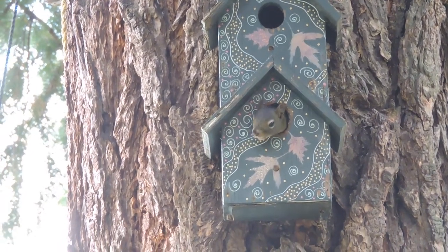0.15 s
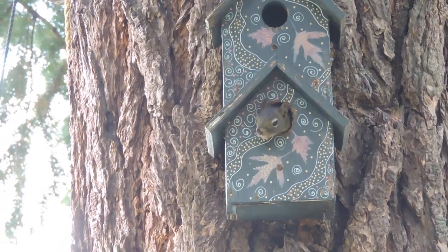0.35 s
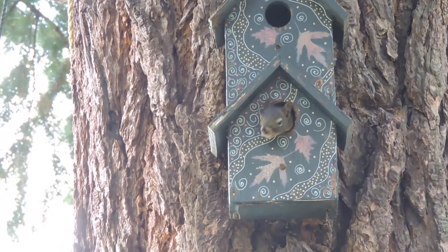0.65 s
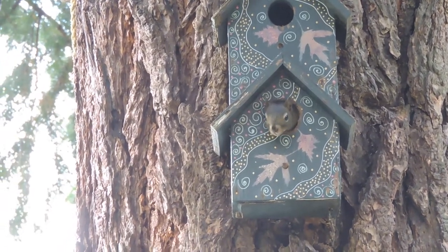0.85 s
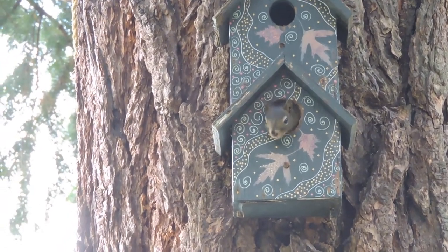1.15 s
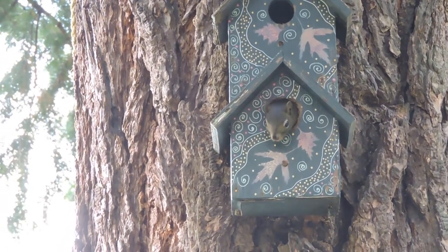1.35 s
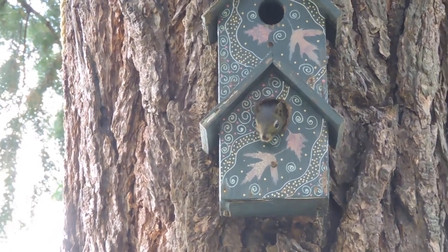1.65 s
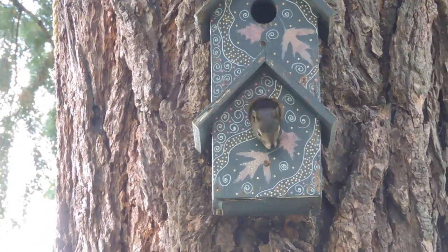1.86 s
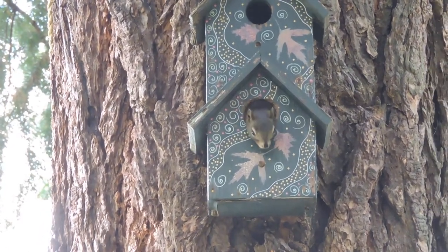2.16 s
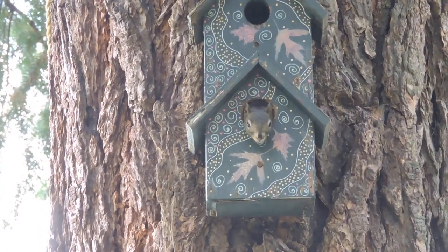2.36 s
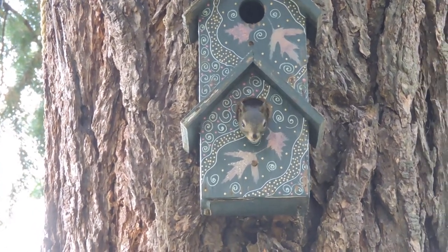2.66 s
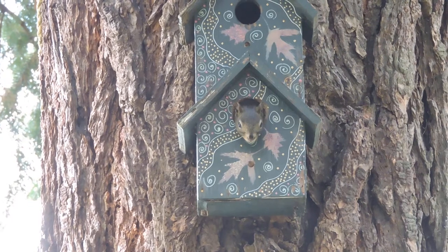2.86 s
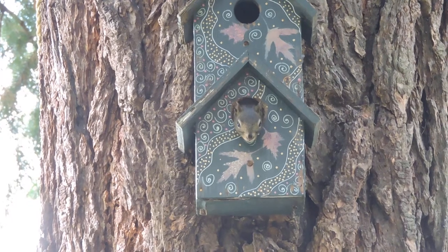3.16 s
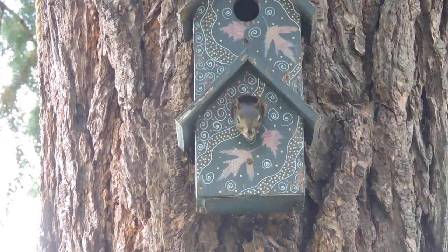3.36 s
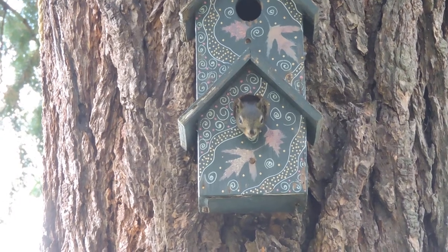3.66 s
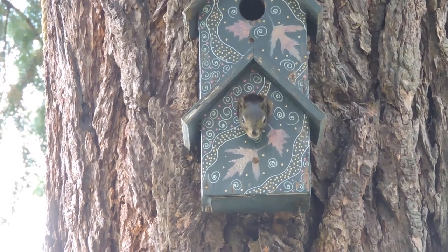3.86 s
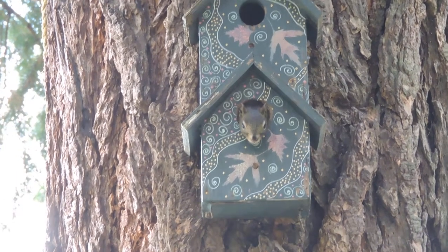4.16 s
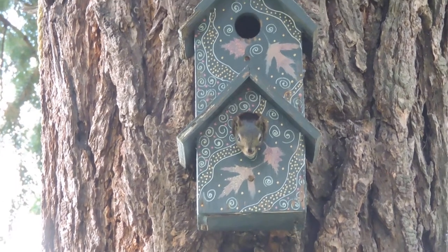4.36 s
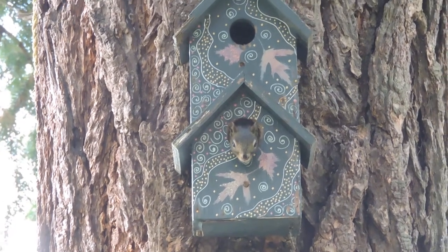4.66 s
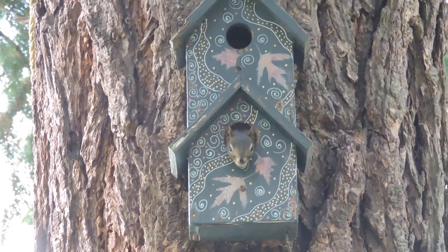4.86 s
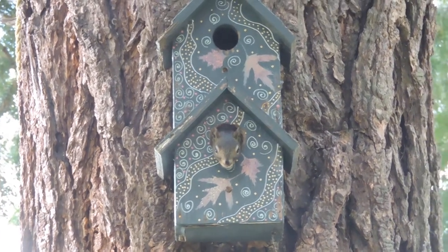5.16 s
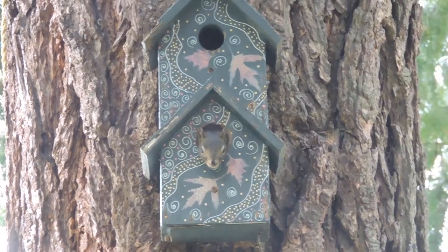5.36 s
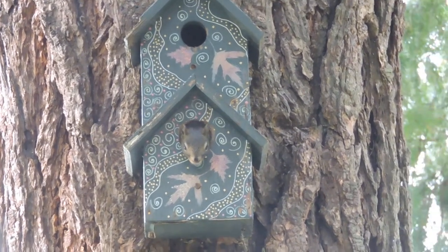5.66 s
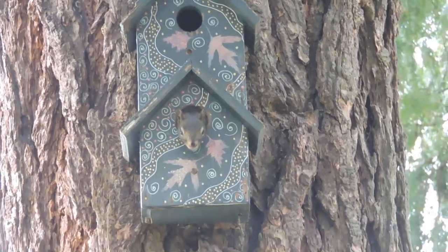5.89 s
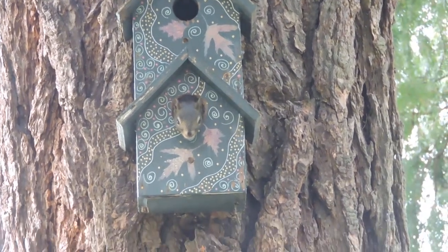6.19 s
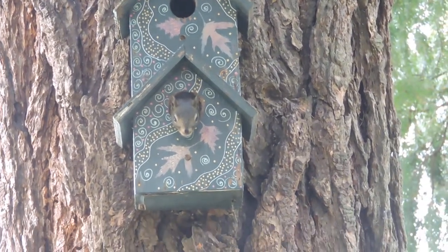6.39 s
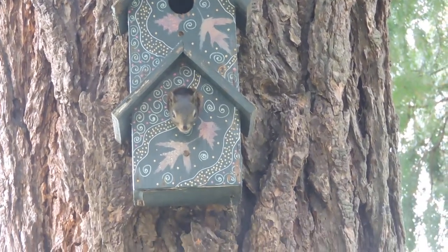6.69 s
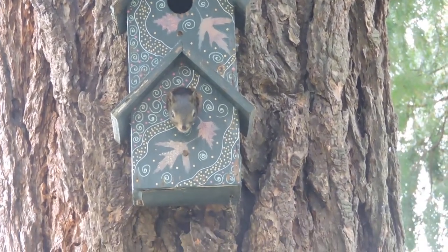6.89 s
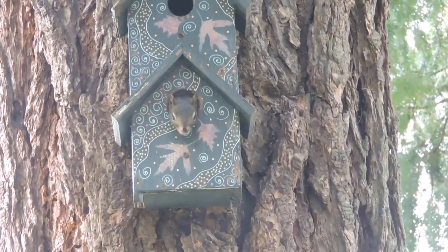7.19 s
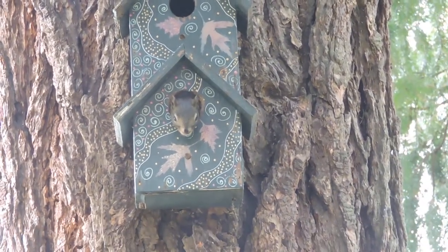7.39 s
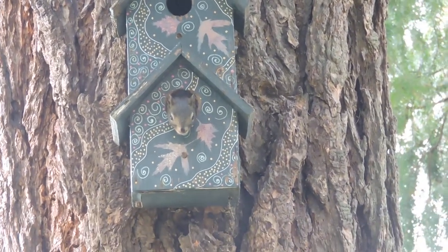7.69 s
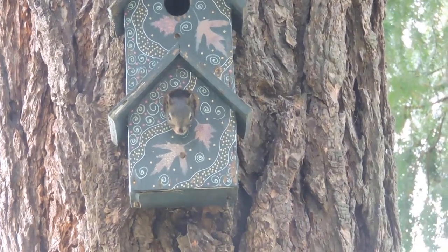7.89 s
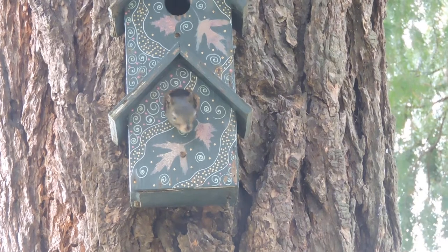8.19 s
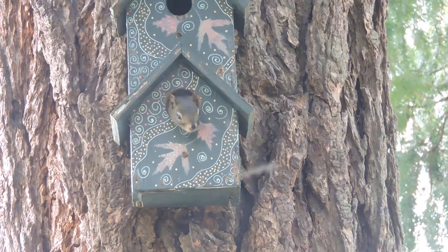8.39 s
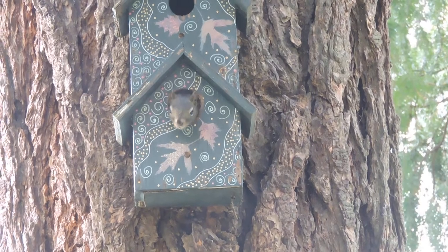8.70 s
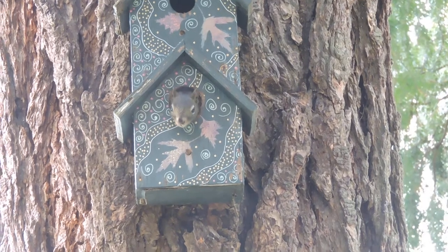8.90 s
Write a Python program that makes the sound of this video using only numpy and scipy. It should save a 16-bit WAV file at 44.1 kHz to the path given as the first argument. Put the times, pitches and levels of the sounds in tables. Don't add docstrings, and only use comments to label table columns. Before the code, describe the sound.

Piercing squirrel alarm calls, tiny squeaks snapping into harsh barks, repeat irregularly outdoors with short woodland echoes above a soft low rumble.

```python
import sys
import numpy as np
from scipy import signal
from scipy.fft import rfft, irfft, next_fast_len
from scipy.io import wavfile
from scipy.ndimage import uniform_filter1d

SR = 44100
rng = np.random.default_rng(int(sys.argv[2]) if len(sys.argv) > 2 else 0)


def persist_wave(psi):
    counts = np.round(np.clip(psi, -1, 1) * 32767).astype(np.int16)
    wavfile.write(sys.argv[1], SR, np.atleast_2d(counts).T)


def invert_db(level):
    return 10 ** (np.asarray(level, dtype=float) / 20)


N = 398663


def scold(animal):
    # onset in seconds, length in seconds, top pulse rate in Hz, mouth and throat level in dB.
    calls = [ (1.146, 0.0431, 1170, -23, -37), (1.207, .046, 982, -26, -42),
             (1.657, 0.0381, 1092, -25, -39.5), (2.56, 0.0402, 1160, -20, -34.5),
             (2.893, 0.02845, 997.5, -33, -34), (3.123, 0.0484, 1149.5, -22.5, -34.5),
             (3.309, 0.0438, 1034.5, -24, -36), (3.519, 0.0466, 1060, -25.5, -37.5),
             (3.749, 0.0487, 1130, -24.5, -36), (3.974, 0.0468, 1089, -24.5, -36.5),
             (4.167, 0.0388, 969, -27, -37.5), (4.984, 0.0484, 1252.5, -23.5, -34),
             (5.353, 0.0342, 991, -34, -35), (5.742, 0.0621, 1138, -27.5, -39),
             (6.327, .048, 1109, -29, -38.5), (6.668, .066, 1059, -35, -40.5),
             (7.052, 0.0495, 998, -30.5, -43.5), (7.381, 0.0497, 1049.5, -30, -44),
             (7.969, 0.0442, 1069, -24, -42), (8.328, 0.039, 964.5, -35.5, -44),
             (8.598, 0.02275, 885, -57, -43)]
    nose_levels = [-40, -42, -43, -44, -38, -41, -43.5, -41.5, -41, -42, -39.5, -36.5, -39.5, -42, -46,
                   -49.5, -54.5, -53, -46, -53, -61]
    roughness = [.2, .3, .3, .25, .25, .45, .5, .5, .5, .5, .5, .15, .35, .55, .55, .6, .5, .35, .25, .45,
                 .6]
    # time the lips take to part in seconds, slow after a whistle, quick in the run.
    parting_times = [.016, .03, .018, 0.0135, .012, .012, .01, 0.016, 0.0121, 0.0157, .012, 0.0211, 0.024,
                     0.0174, 0.013, 0.032, 0.019, .018, 0.0286, .016, .014]
    for call, nose_db, rough, parting_s in zip(calls, nose_levels, roughness, parting_times):
        add(animal, *chuck(chuck_rows(*call, nose_db), rough, parting_s))


def chuck_rows(s, length, hz, mouth_db, throat_db, nose_db):
    # share of the top pulse rate, then mouth, throat and nose level in dB.
    chuck_shape = [
        (.63, -46.5, -27, -15.5),
        (.70, -8, -6.5, -10.5),
        (.93, -0.5, -1, 1),
        (1.01, -14, -10.5, -7),
        (1.02, -20, -31.5, -2),
    ]
    lead_s, peak_at, hold_at = 0.008, 0.27, 0.6
    shares = [-lead_s / length, 0, peak_at, hold_at, 1]
    usual_s, sustain_db_per_s = 0.0537, 604
    lift_db = sustain_db_per_s * (length - usual_s)
    rows = []
    for share, (rate, mouth, throat, nose) in zip(shares, chuck_shape):
        mouth_now_db = mouth_db + mouth + lift_db * max(share - peak_at, 0)
        rows.append((s + share * length, hz * rate, mouth_now_db, throat_db + throat, nose_db + nose))
    return rows


def chuck(rows, rough, parting_s):
    # centre in Hz, width in Hz, level in dB.
    throat_modes = [(1900, 800, -25), (3200, 800, 0), (4700, 1100, -13)]
    nose_modes = [(5600, 1190, -3), (6600, 1096, 5), (7422, 2090, 1.5)]
    mouth_modes = [(12340, 1720, 3.5), (15030, 2700, -22), (9656, 1470, -12)]
    start, t, (hz, mouth_db, throat_db, nose_db) = columns(rows)
    jitter, breath, slam = rng.standard_normal((len(t), 3)).T
    peak_s, end_s = rows[2][0], rows[-1][0]
    late = np.clip((t + start - peak_s) / (end_s - peak_s), 0, 1)
    arch = 1 + 0.081 * np.sin(np.pi * late ** 0.7)
    hz = uniform_filter1d(hz, 200) * arch * (1 - 0.2 * np.exp(-t / 0.005))
    rough = np.clip(rough + 0.374 * late, 0, 0.95)

    turns = np.cumsum(hz * (1 + 0.33 * rough * uniform_filter1d(jitter, 40))) / SR
    pulses = evened(sum(np.cos(2 * np.pi * k * turns) * (k * hz < 17000) for k in range(1, 30)))
    puffs = evened((0.16 + np.exp(-(turns % 1) / 0.408)) * breath)
    uneven = invert_db(2.89 * rough * evened(uniform_filter1d(slam, 70)))
    harsh = uneven * (np.sqrt(1 - rough) * pulses + np.sqrt(rough) * puffs)
    throat_drive = uneven * (pulses + 2.57 * rough * puffs)

    shut = np.exp(-(t / parting_s) ** 2)
    opening = [(11400 - 2300 * shut, 1400, -3)]
    opening += [(f, width, db - 9 * shut) for f, width, db in mouth_modes]
    larynx = (hz.max() / 1200) ** 0.451
    lifted = [(f * larynx, width, db) for f, width, db in throat_modes]
    voice = invert_db(mouth_db) * tract(harsh, opening) + invert_db(nose_db - 1) * tract(harsh, nose_modes)
    voice += invert_db(throat_db) * tract(throat_drive, lifted)
    thump = np.sin(2 * np.pi * turns) + 0.425 * tract(puffs, [(825, 1836, 0)])
    chest = invert_db(0.3138 * mouth_db - 41.0) * uneven * thump
    return start, (invert_db(0.5) * voice + chest) * signal.windows.tukey(len(t), 0.2)


def steady_whistles(animal):
    # start in seconds, length in seconds, pitch in Hz, tone level and octave level in dB.
    level = [
        (1.107, 0.0268, 6204, -29.5, -49),
        (1.609, .032, 6231, -31, -50),
        (6.278, 0.0184, 6394, -40, -61),
        (6.976, 0.021, 5920, -62.5, -83.5),
    ]
    held = [
        (1.185, 0.01964, 5990, -33.5, -52.5),
        (4.947, 0.0282, 6223, -23.5, -40),
        (7.652, 0.0499, 6237, -45, -52),
    ]
    peeps = [
        (2.924, .021, 5726, -33.5, -38.5),
        (8.252, .038, 5495, -65.5, -77),
        (8.621, 0.0298, 5398, -41.5, -52.5),
    ]
    # share of the length, share of the pitch, then tone, octave and air level in dB.
    level_shape = [(0, .83, -38, -40, -45), (.15, .92, -22, -10, -35), (.42, 1.045, -14, -5, -29),
                   (.64, 1., -2, -2, -29), (.85, .995, 0, 0, -30), (1, .88, -24, -10, -32)]
    hold_shape = [(0, .87, -24, -20, -36), (.16, .94, -13, -6, -30), (.4, .995, -3, -1, -28),
                  (.62, 1.005, 0, 0, -28), (.86, 1., -1, -4, -27), (1, .96, -16, -20, -26)]
    peep_shape = [(0, 0.78, -9, -16, -24.5), (.2, 0.982, -5.5, 3.5, -27.5), (.42, 1., 0, -1.5, -24),
                  (.72, .96, 0.5, 0, -28.5), (1, .87, -9.5, -12.5, -25.5)]
    for shape, calls in [(level_shape, level), (hold_shape, held), (peep_shape, peeps)]:
        for s, length, hz, tone_db, octave_db in calls:
            rows = [(s + share * length, hz * pitch, tone_db + tone, octave_db + octave, tone_db + hiss)
                    for share, pitch, tone, octave, hiss in shape]
            add(animal, *whistle(rows))


def leaping_whistles(animal):
    # start in seconds, length in seconds, crack pitch in Hz, landing level and air level in dB.
    leaps = [(2.514, 0.0374, 7800, -27.5, -44), (5.698, 0.0365, 7680, -32.5, -46),
             (6.285, 0.0305, 7240, -55.5, -42.5), (6.624, 0.0364, 7250, -35.5, -51.5),
             (6.990, .051, 7050, -32.5, -58.5), (7.334, 0.0361, 7450, -39, -53.5),
             (7.919, 0.041, 7920, -33, -50.5)]
    # share of the length, share of the landing pitch, share of the crack,
    # then tone, octave and air level in dB.
    leap_shape = [(0, .85, 0.073, -35, -41.5, -34.5), (.18, .97, 0, -19, -6.5, -14.5),
                  (.42, 1.02, .45, -33, -24.5, -1.5), (.66, 1., 1., -19, -39.5, 4),
                  (.77, 1., 0.724, -10.5, -29.5, -1), (.87, 1., 0.032, 2, 6, 2),
                  (1, 0.897, 0, -27.5, -26, -2)]
    land_hz, land_octave_db = 6237, -18
    for s, length, crack_hz, tone_db, air_db in leaps:
        rows = [(s + share * length, land_hz * pitch + jump * (crack_hz - land_hz), tone_db + tone,
                 tone_db + land_octave_db + octave, air_db + hiss)
                for share, pitch, jump, tone, octave, hiss in leap_shape]
        add(animal, *whistle(rows))


def whistle(rows):
    start, t, (hz, tone_db, octave_db, air_db) = columns(rows)
    waver, breath = rng.standard_normal((len(t), 2)).T
    wavering_hz = uniform_filter1d(hz, 60) * (1 + 0.00875 * evened(uniform_filter1d(waver, 60)))
    phase = 2 * np.pi * np.cumsum(wavering_hz) / SR
    tone = np.sqrt(2) * (invert_db(tone_db) * np.sin(phase) + invert_db(octave_db) * np.sin(2 * phase))
    hiss = tract(breath, [(12400, 1530, 1.67), (10200, 1530, -1.6), (6900, 2700, 1.1)])
    return start, (tone + invert_db(air_db) * hiss) * signal.windows.tukey(len(t), 0.06)


def wheezes(animal):
    # start in seconds, length in seconds, level in dB, centre in Hz, width in Hz.
    breaths = [(0.012, 0.036, -63.5, 6900, 1200), (0.076, 0.043, -63.5, 6680, 900),
               (0.246, 0.085, -68.5, 8100, 700), (4.575, 0.16, -68, 6900, 1500),
               (4.598, 0.13, -67.5, 12500, 2500), (4.76, 0.069, -67, 7140, 250),
               (4.78, 0.111, -70, 12400, 1200), (4.815, 0.133, -64, 6470, 900),
               (5.905, .035, -66.5, 7130, 200), (5.961, 0.094, -66, 6450, 900),
               (6.099, 0.119, -63.5, 6681, 1800), (6.091, 0.142, -67.5, 12200, 2200),
               (7.615, 0.0505, -57, 6180, 3000), (9.023, 0.023, -62, 6600, 1200),
               (1.792, 0.0128, -52.5, 2290, 90), (1.881, 0.014, -54, 2346, 91.3),
               (2.199, 0.045, -65, 3936, 200), (6.294, 0.01873, -38.5, 10000, 900),
               (8.598, 0.014, -55.5, 5600, 200), (1.119, 0.0102, -51, 9240, 196.9)]
    for s, length, db, hz, width in breaths:
        noise = rng.standard_normal(round(length * SR))
        fade = signal.windows.tukey(len(noise), 0.6)
        add(animal, s, invert_db(db) * evened(resonate(noise, hz, width)) * fade)


def claw_ticks(animal):
    # start in seconds, peak level in dB, ring in Hz.
    ticks = [(0.4715, -50, 11200), (4.4902, -53.5, 12000), (4.5138, -48, 11100), (4.522, -50.5, 11200),
             (4.7596, -48, 10700), (5.9581, -51.5, 9500), (7.3536, -32, 6670)]
    t = np.arange(300) / SR
    for s, db, hz in ticks:
        ring = evened(resonate(rng.standard_normal(len(t)), hz, 4030))
        add(animal, s, invert_db(db - 60 * t / 0.0116) * ring)


def grove(x):
    # band in Hz, time to fall 60 dB in seconds.
    decay = [(1000, 0.474), (3000, 0.2765), (6000, 0.312), (12000, 0.282)]
    # delay in seconds, level in dB.
    echoes = [
        (.0009, -31),
        (.0023, -47.5),
        (.0046, -14),
        (0.0193, -2.5),
        (0.031, -9),
    ]
    # band in Hz, left-right level in dB, left lag in radians, reflected level in dB.
    port_bands = [(400, -3, .1, -8), (1000, 1.5, .3, -9), (2400, -4.5, .8, -5), (4400, -3, .4, -5),
                  (6500, -5.5, .9, -6), (9300, -10.5, 1.6, -6), (11000, -10, 1, -9),
                  (12500, -6.5, 1.2, -10), (15500, -3, 1.6, -7)]
    taps = np.zeros((2, SR // 2))
    at = np.arange(300, SR // 2 - 20, 20) + rng.integers(0, 20, (2, (SR // 2 - 301) // 20))
    np.put_along_axis(taps, at, rng.choice([-1., 1.], at.shape), 1)
    taps[0] = 0.144 * taps[1] + 2.13 * taps[0]
    hz, t, z = signal.stft(taps, SR, nperseg=256)
    tail = signal.istft(z * invert_db(-60 * t / read(decay, hz)[:, None]), SR, nperseg=256)[1]
    tail /= np.linalg.norm(tail, axis=1, keepdims=True)
    for s, db in echoes:
        tail[[0, 1], round(s * SR) + rng.integers(-5, 6, 2)] += invert_db(db)

    size = next_fast_len(N + SR)
    hz = np.fft.rfftfreq(size, 1 / SR)
    lean_db, lag, wet_db = (read(np.take(port_bands, [0, k], 1), hz) for k in (1, 2, 3))
    ports = np.array([invert_db(lean_db / 2) * np.exp(-1j * lag), invert_db(-lean_db / 2)])
    room = 1 + invert_db(wet_db) * rfft(tail, size)
    return irfft(rfft(x, size) * ports * room, size)[:, :N]


def leaves_and_wash():
    # band in Hz, level in dB per Hz.
    spectrum = [(12, -29), (20, -3), (101, -7), (163, -10.5), (328, -15.5), (590, -21), (873, -19.5),
                (1060, -24.5), (1570, -25.5), (3250, -28.5), (3950, -30), (16000, -41)]
    # band in Hz, likeness of left and right from 0 to 1.
    likeness = [(60, 0.886), (380, 0.537), (2380, 0.229), (15000, 0.29)]
    # band in Hz, left-right level in dB.
    lean_bands = [(60, -4.5), (240, -3), (950, 2.5), (3770, -1), (15000, 0.5)]
    frames, hz = N // 512 + 5, np.fft.rfftfreq(2048, 1 / SR)
    a, b, c, d, patches = rng.standard_normal((frames, 1025, 5)).T
    patches = evened(uniform_filter1d(uniform_filter1d(patches, 20, 0), 10, 1))
    same = np.clip(read(likeness, hz), 0, 1)[:, None]
    left = a + 1j * b
    right = same * left + np.sqrt(1 - same ** 2) * (c + 1j * d)
    lean = read(lean_bands, hz)[:, None] / 2
    z = np.array([invert_db(lean) * left, invert_db(-lean) * right])
    z *= invert_db(read(spectrum, hz)[:, None] + 1.407 * patches)
    return invert_db(-50) * evened(signal.istft(z, nperseg=2048, noverlap=1536)[1][:, :N])


def far_motors():
    # centre in Hz, width in Hz, level in dB.
    rumble = [(29.44, 7.34, 4.5), (56.9, 10.36, 0.5), (89.43, 20.3, -5.5)]
    drone = [(250, 66, -6), (337.7, 118.5, 3.5)]
    # centre in Hz, width in Hz, level in dB.
    fan = (885, 44, -73)
    # time in seconds, rumble level and drone level in dB.
    swell = [(0.0, -36, -68), (0.05, -50.5, -51), (0.85, -48.5, -61.5), (9.04, -54.5, -58.5)]
    rumble_db, drone_db = (np.pad(curve, (0, SR), "edge")[:N] for curve in columns(swell)[2])
    noise = rng.standard_normal(N)
    motors = invert_db(rumble_db - 4) * tract(noise, rumble) + invert_db(drone_db - 6) * tract(noise, drone)
    return motors * invert_db([[-1.6], [1.6]]) + invert_db(fan[2]) * tract(noise, [fan])


def tract(drive, modes):
    return evened(sum((-1) ** k * invert_db(db) * resonate(drive, f, w) for k, (f, w, db) in enumerate(modes)))


def resonate(x, hz, width):
    turn = np.exp(2j * np.pi * np.cumsum(hz * np.ones(len(x))) / SR)
    r = np.exp(-np.pi * width / SR)
    return 2 * (turn * signal.lfilter([(1 - r) ** 2], [1, -2 * r, r * r], x / turn)).real


def columns(rows):
    s, *values = np.transpose(rows)
    t = np.arange(s[0], s[-1], 1 / SR)
    return s[0], t - s[0], [np.interp(t, s, v) for v in values]


def read(points, hz):
    f, value = np.transpose(points)
    return np.interp(np.log(hz + 1), np.log(f + 1), value)


def evened(x):
    return x / np.sqrt(np.mean(x ** 2) + 1e-20)


def add(mix, s, sound):
    part = mix[round(s * SR):][:len(sound)]
    part += sound[:len(part)]


def scene():
    animal = np.zeros(N)
    scold(animal)
    steady_whistles(animal)
    leaping_whistles(animal)
    wheezes(animal)
    claw_ticks(animal)
    return grove(animal) + leaves_and_wash() + far_motors()


def low_pass(x):
    return signal.sosfilt(signal.butter(12, 16340, fs=SR, output="sos"), x)


def record(dry):
    edge = signal.firwin(255, 15800, window=("kaiser", 9), fs=SR)
    mix = signal.oaconvolve(dry, edge[None], "same")
    return low_pass(mix)


dry = scene()
out = record(dry)
persist_wave(out)
```